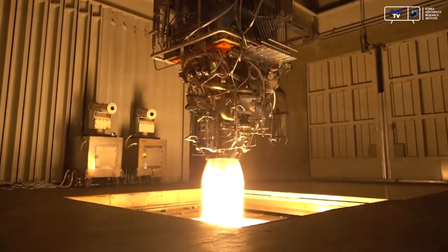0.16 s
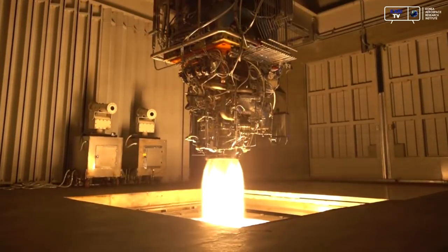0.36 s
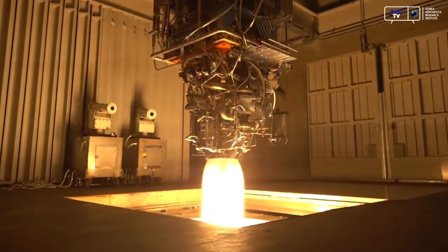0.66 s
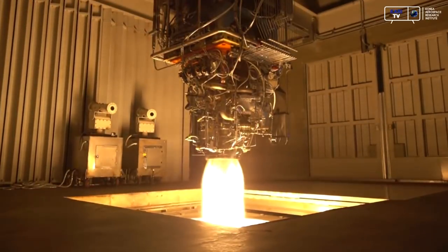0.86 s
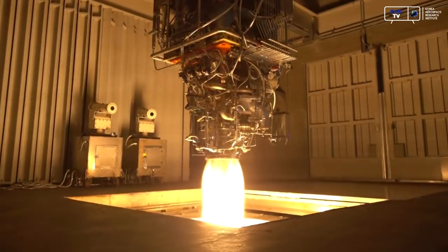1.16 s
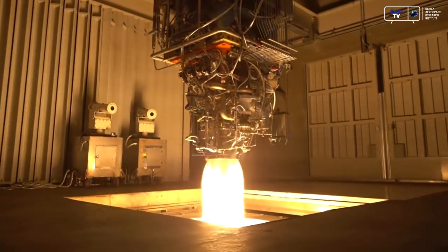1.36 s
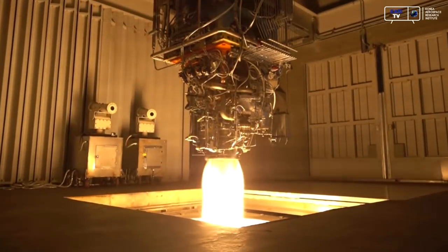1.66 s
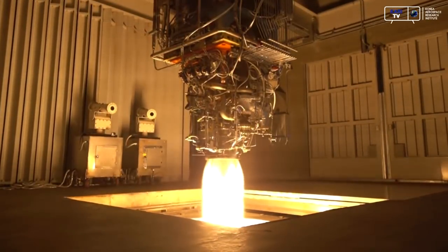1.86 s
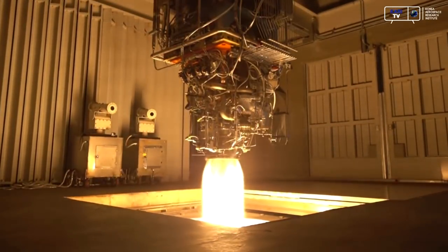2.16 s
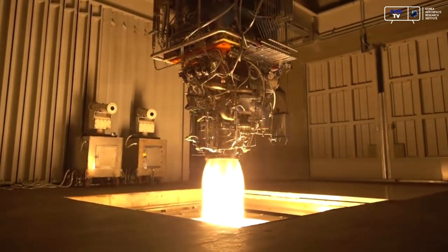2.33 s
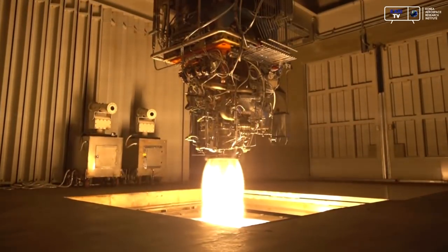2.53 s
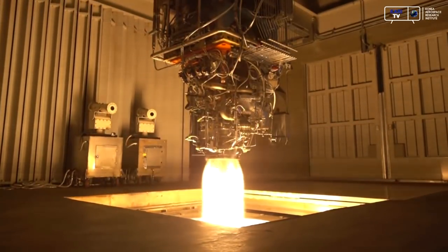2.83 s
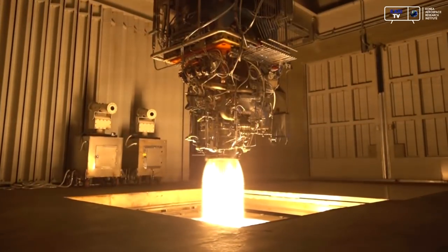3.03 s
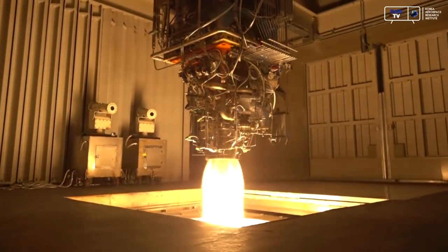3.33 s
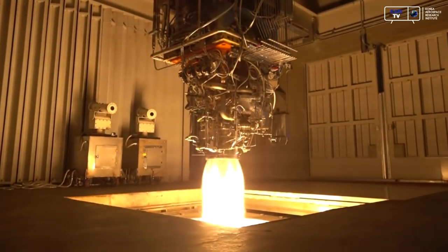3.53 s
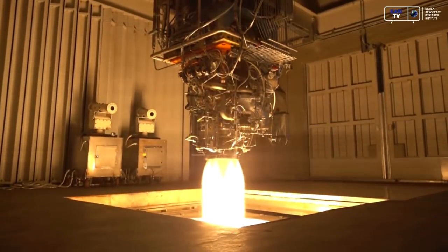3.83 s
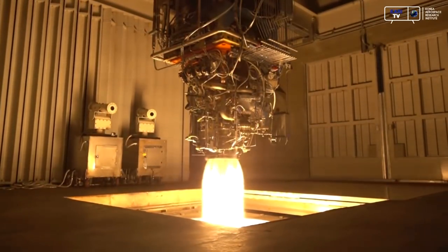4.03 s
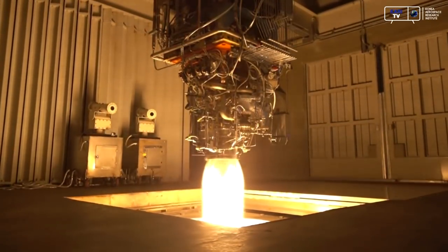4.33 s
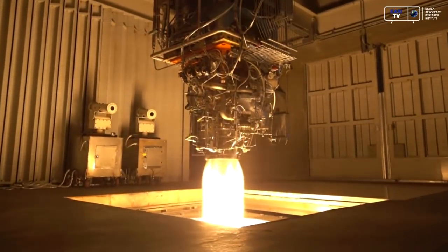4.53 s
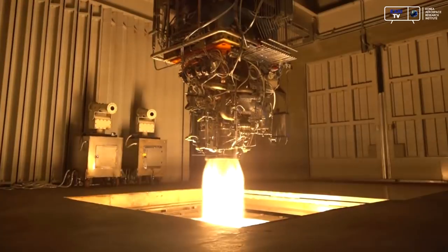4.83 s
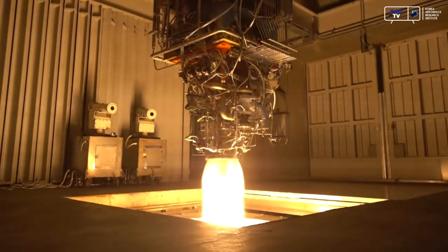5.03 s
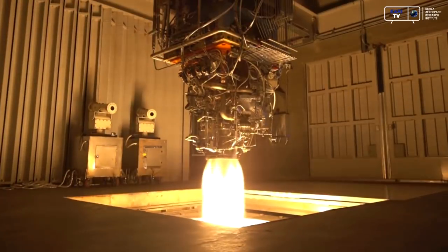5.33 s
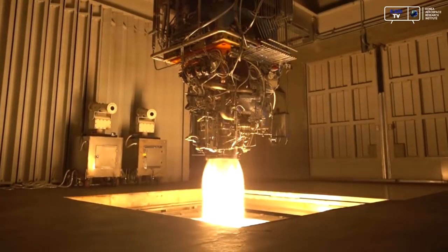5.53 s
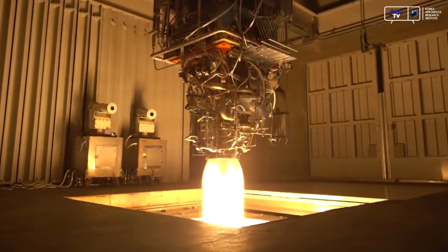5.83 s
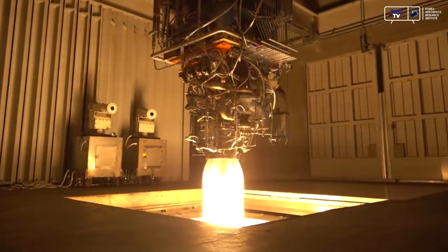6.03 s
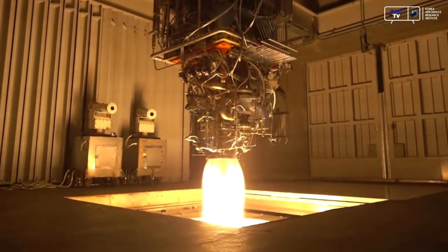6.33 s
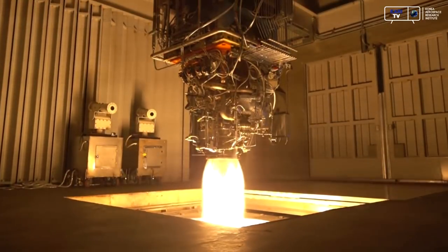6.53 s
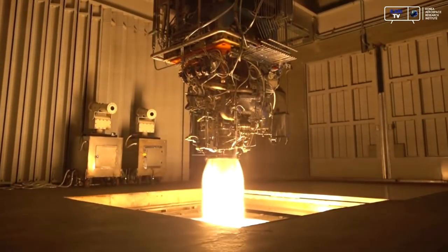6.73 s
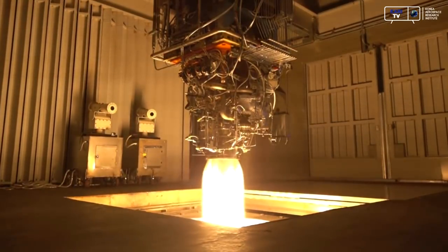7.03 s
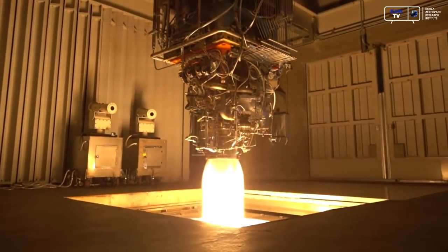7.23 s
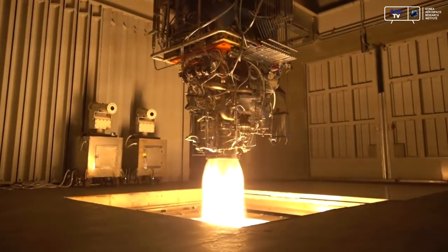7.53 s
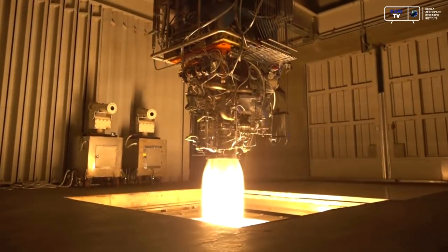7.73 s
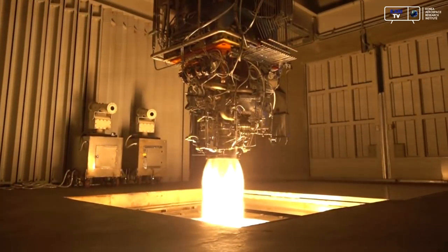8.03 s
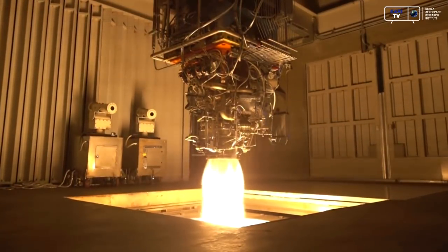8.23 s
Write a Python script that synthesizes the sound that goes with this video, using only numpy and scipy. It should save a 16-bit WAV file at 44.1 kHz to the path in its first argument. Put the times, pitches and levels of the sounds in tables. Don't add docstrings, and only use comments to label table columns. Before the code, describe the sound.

A large rocket engine is already firing at full thrust inside a steel-walled test bay and never stops. Its jet makes a dense, even roar centred in the mids and upper mids, with a bright, grainy hiss above. Low rumble is cut away. The sound is very wide and enveloping, heard by a small camera's stereo microphones, slightly overloaded.

```python
import sys
import numpy as np
from scipy import signal
from scipy.fft import rfft, irfft, next_fast_len
from scipy.io import wavfile
from scipy.ndimage import uniform_filter1d

SR = 44100
rng = np.random.default_rng(int(sys.argv[2]) if len(sys.argv) > 2 else 0)


def makeup_ratio(level_db):
    decades = np.asarray(level_db, float) / 20
    return 10 ** decades


def master(y):
    cut = np.clip(np.atleast_2d(y).T, -1, 1)
    pcm = np.round(cut * 32767)
    wavfile.write(sys.argv[1], SR, pcm.astype(np.int16))


N = 369558

# pitch_hz, level_db (per Hz)
ROAR_SPECTRUM = [(60, -58), (110, -61), (135, -31.5), (170, -22.5), (250, -14), (500, -5.5), (1000, -2),
                 (1900, 1), (2900, -1.5), (3900, -5), (5500, -5.5), (8000, -5.5), (12000, -20.5)]
# pitch_hz, level_db (per Hz)
SHOCK_SPECTRUM = [(2000, -60), (4500, -22), (6200, -9), (7100, -1), (8300, 0), (9500, -1.5), (11000, -4),
                  (12500, -5.2), (14200, -4.6), (15700, -4.6)]
# pitch_hz, level_db
STEREO_WIDTH = [(100, -22), (250, -1), (500, 2), (900, 4), (1500, 2), (2500, -1), (4000, -2), (5500, -1.5),
                (7800, -5), (10000, -3.5), (12000, -1.2), (15000, -1.5)]
# pitch_hz, level_db
LEFT_LEAN = [(100, 0.5), (6000, -0.2), (10000, 0.6), (12500, 0.8), (15000, 3.5)]
TRAP_CENTRES = [5760, 6708, 7672]
# half_width_hz, depth_db
TRAP_SHAPES = [(171, -45), (135, -22), (94, -19)]

FRAME, HOP = 512, 128


def roar():
    noise = rng.standard_normal((2, N))
    eddies = churn(noise, patch_db=0.34, flicker_db=0.5,
                   patch_frames=24, patch_bins=10, flicker_frames=6)
    return makeup_ratio(2.5) * plume(eddies, ROAR_SPECTRUM, start_db=-24.5, creep_db_per_s=0.0332)


def shock_hiss():
    cracks_per_s = 2500
    size_db = 2.5 * np.minimum(rng.exponential(1, N), 5)
    size = makeup_ratio(size_db) * (rng.random(N) < cracks_per_s / SR)
    fronts = evened(size * rng.standard_normal((2, N)))
    drive = rng.standard_normal((2, N)) + 0.3 * fronts
    cells = churn(drive, patch_db=0.24, flicker_db=0.2,
                  patch_frames=59, patch_bins=52, flicker_frames=13)
    return makeup_ratio(3.5) * plume(cells, SHOCK_SPECTRUM, start_db=-21.5, creep_db_per_s=-0.02)


def plume(drive, spectrum, start_db, creep_db_per_s):
    middle, side = colour(drive, lambda hz: makeup_ratio(read(spectrum, hz)))
    side = colour(side, lambda hz: makeup_ratio(read(STEREO_WIDTH, hz)))
    time_s = np.arange(N) / SR
    level = makeup_ratio(start_db + creep_db_per_s * time_s)
    return level * np.array([middle, side]) / np.std(middle)


def churn(x, patch_db, flicker_db, patch_frames, patch_bins, flicker_frames):
    hz, t, z = signal.stft(x, SR, nperseg=FRAME, noverlap=FRAME - HOP)
    patches = rng.standard_normal((len(t), len(hz))).T
    patches = uniform_filter1d(patches, round(patch_bins), axis=0)
    patches = uniform_filter1d(patches, round(patch_frames), axis=1)
    flicker = uniform_filter1d(rng.standard_normal(len(t)), round(flicker_frames))
    z = z * makeup_ratio(patch_db * evened(patches) + flicker_db * evened(flicker))
    return signal.istft(z, SR, nperseg=FRAME, noverlap=FRAME - HOP)[1][:, :N]


def colour(x, gain):
    size = next_fast_len(N + 8192)
    hz = np.fft.rfftfreq(size, 1 / SR)
    return irfft(rfft(x, size) * gain(hz), size)[..., :N]


def read(points, hz):
    pitch_hz, value = np.transpose(points)
    return np.interp(np.log(hz + 1), np.log(pitch_hz + 1), value)


def evened(x):
    return x / np.sqrt(np.mean(x ** 2) + 1e-20)


def scene():
    middle, side = roar() + shock_hiss()
    return np.array([middle + side, middle - side])


def traps(hz):
    gain = 1
    for centre_hz, (half_width_hz, depth_db) in zip(TRAP_CENTRES, TRAP_SHAPES):
        off = (hz - centre_hz) / half_width_hz
        gain = gain * (makeup_ratio(depth_db) + 1j * off) / (1 + 1j * off)
    return gain


def top_cut(x):
    return signal.sosfilt(signal.butter(12, 15755, fs=SR, output="sos"), x)


def record(dry):
    ceiling = 1.63
    x = ceiling * np.tanh(dry / ceiling)
    share = np.array([[.5], [-.5]])

    def camera_gain(hz):
        lean = makeup_ratio(share * read(LEFT_LEAN, hz))
        rumble_cut = 1 / np.sqrt(1 + (125 / (hz + 1)) ** 2.5)
        return lean * traps(hz) * rumble_cut

    return top_cut(colour(x, camera_gain))


dry = scene()
out = record(dry)
master(out)
```